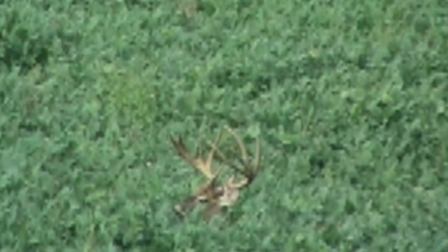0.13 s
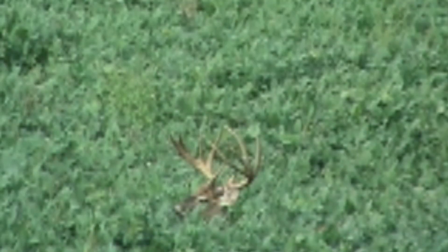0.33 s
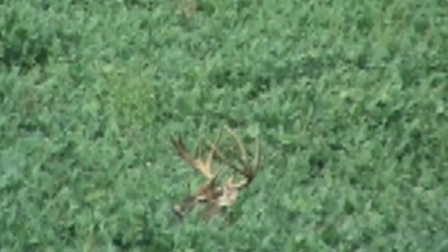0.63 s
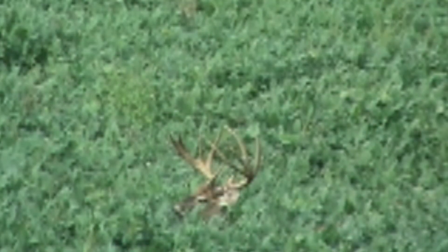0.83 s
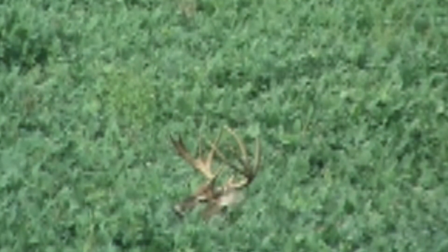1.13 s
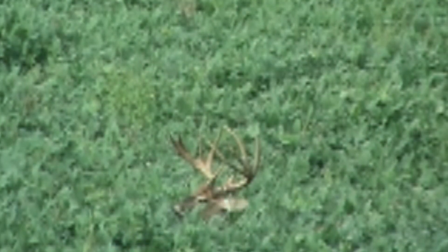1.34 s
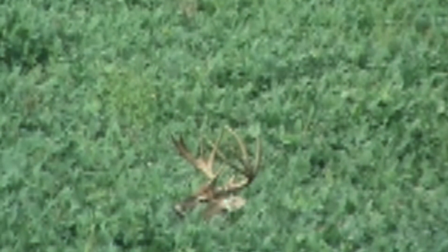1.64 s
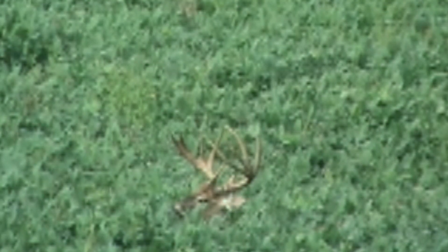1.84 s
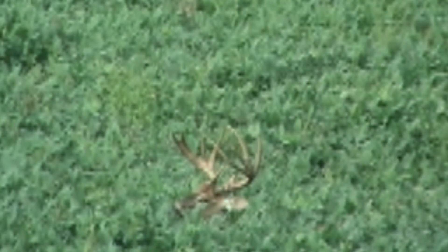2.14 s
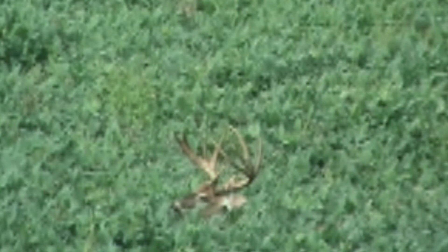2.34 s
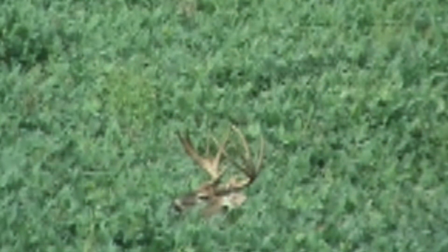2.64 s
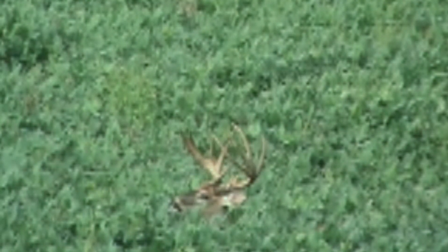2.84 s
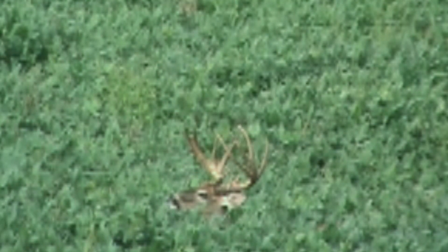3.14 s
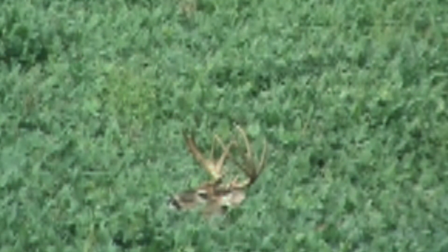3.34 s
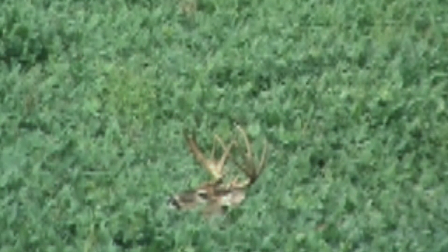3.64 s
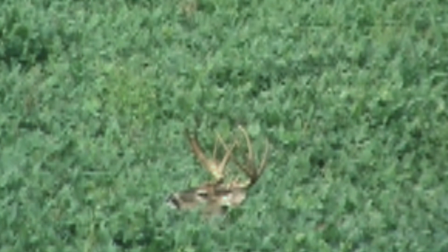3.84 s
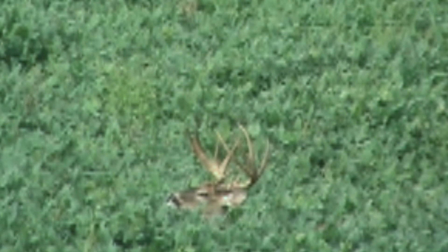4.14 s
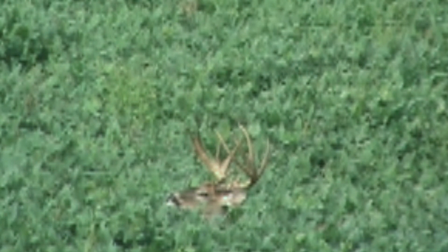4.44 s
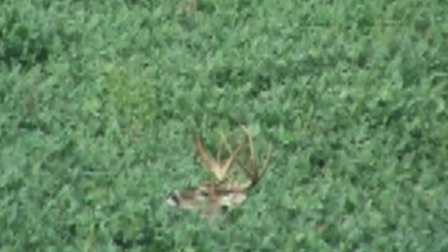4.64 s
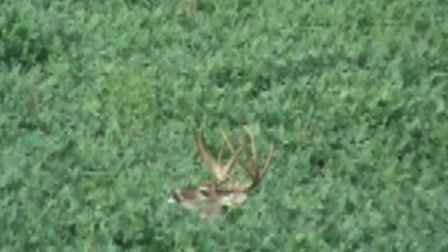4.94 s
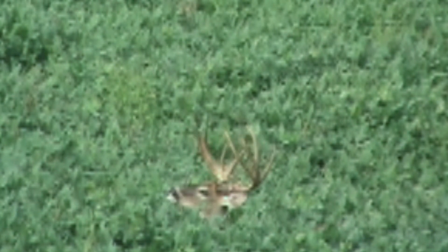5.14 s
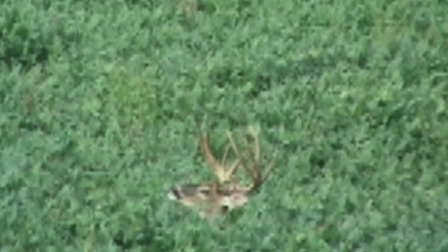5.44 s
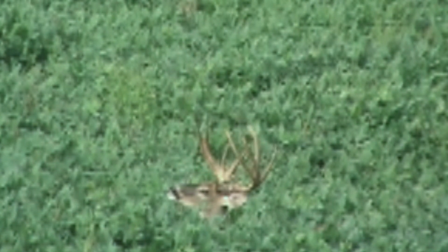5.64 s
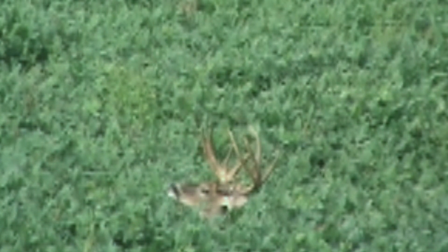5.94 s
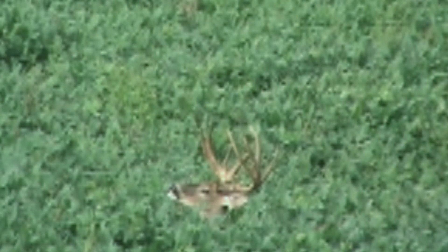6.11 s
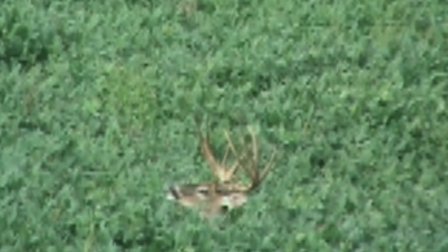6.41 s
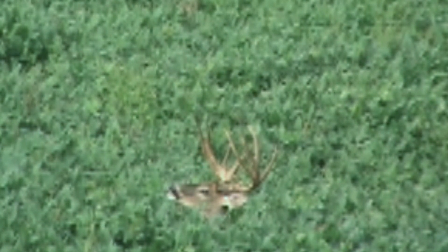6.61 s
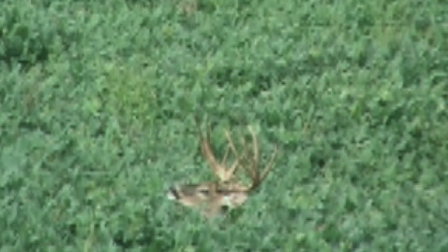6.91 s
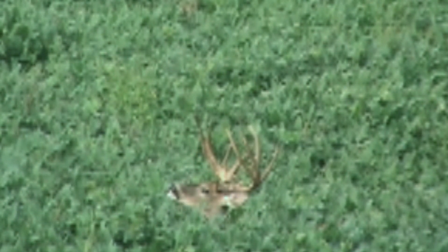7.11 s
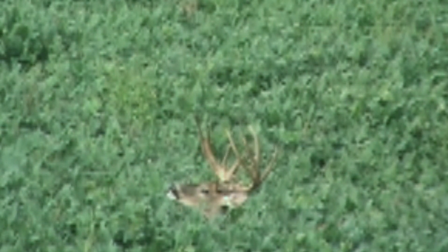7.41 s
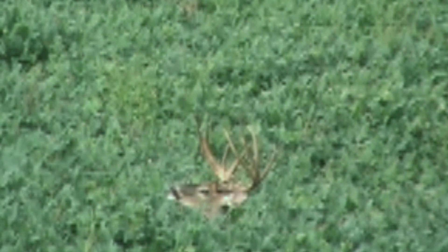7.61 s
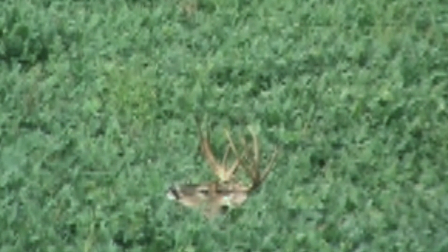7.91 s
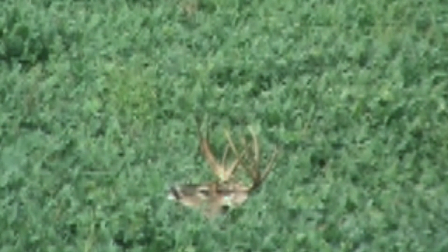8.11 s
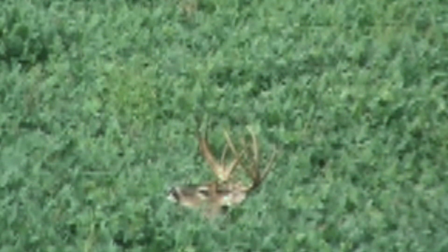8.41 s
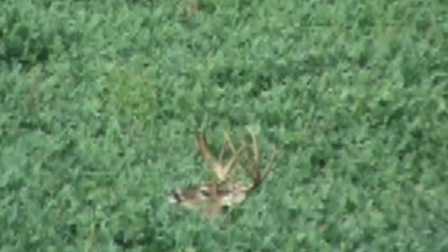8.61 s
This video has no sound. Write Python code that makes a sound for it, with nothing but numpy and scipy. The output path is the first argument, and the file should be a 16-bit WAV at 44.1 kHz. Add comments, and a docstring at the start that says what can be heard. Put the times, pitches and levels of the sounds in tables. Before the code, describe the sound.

A high, steady trill of crickets fills an open summer field, with katydids rasping above it. Cicadas build over the first few seconds into a throbbing buzz and keep going. Faint distant traffic and a low machine hum lie underneath. A far animal calls softly a few times in the first half. Near the end a dry stalk ticks and a camera lens motor pips quietly. The sound is mono.

```python
"""A high, steady trill of ground crickets fills a summer field, with katydids rasping on top. Cicadas swell in
the trees, their clicking tymbals fused into a throbbing song. Underneath sit distant traffic and a machine hum;
a far animal calls, a tree cricket chirps faintly, dry stalks tick. A camera adds a thin whine, and near the end
its lens motor starts with a sharp click and pips softly. Everything is mono."""
import sys
import numpy as np
from scipy import signal
from scipy.fft import rfft, irfft, next_fast_len
from scipy.io import wavfile
from scipy.ndimage import map_coordinates

SR = 44100
rng = np.random.default_rng(int(sys.argv[2]) if len(sys.argv) > 2 else 0)


def master(y):
    """Save y as 16-bit WAV."""
    cut = np.clip(np.atleast_2d(y).T, -1, 1)
    pcm = np.round(cut * 32767)  # scale
    wavfile.write(sys.argv[1], SR, pcm.astype(np.int16))


N = 386316

# wing spectrum of the far ground crickets: f/Hz, relative level/dB
WING_SPECTRUM = [(3000, -43), (4200, -37), (5200, -30), (6200, -29), (6900, -16.5), (7400, -4),
                 (7810, -1.5), (8200, -5.5), (8600, -11.5), (9300, -31), (11000, -60)]
# fader ride of the ground crickets: t/s, relative level/dB
CRICKET_RIDE = [(0, -28), (1.6, -27.5), (2.3, -28), (3.6, -27.5), (4, -29.0), (4.5, -27.5), (5.8, -27.9),
                (6.3, -27.1), (7.9, -27.5), (8.76, -28.0)]
# spectrum of the katydids' scrape: f/Hz, relative level/dB
RASP_SPECTRUM = [(7000, -29), (9700, -6.5), (11000, -2.5), (12200, -0.5), (13150, 3.5), (14200, 2),
                 (15200, -1.5), (15800, -17)]
# fader ride of the katydids: t/s, relative level/dB
KATYDID_RIDE = [(0, -38.6), (0.8, -39), (2.3, -41), (2.8, -39), (4.8, -39.5), (5.8, -38.4), (6.4, -40.5),
                (7.2, -40), (7.7, -42), (8.3, -40.0), (8.76, -40.5)]
# body resonance of the cicadas: f/Hz, relative level/dB
CICADA_SPECTRUM = [(2500, -45), (3300, -25.5), (3880, -13.5), (4090, -10), (4550, -12), (5200, -10.5),
                   (5700, -5), (6300, -1.5), (7000, 0.5), (7800, -1.5), (8800, -3), (9400, -19),
                   (11000, -40)]
# single cicadas ringing out of the chorus: f/Hz, level/dB relative to the chorus
CICADA_VOICES = [(4082, -29), (4117, -29), (4204, -30), (4256, -28), (4330, -30), (4804, -28), (4937, -28),
                 (4974, -28), (6017, -21), (6247, -22), (6316, -21)]
# spectrum of the far traffic: f/Hz, relative level/dB
ROAD_SPECTRUM = [(15, -29), (28, -4), (45, -7), (65, -13.5), (88, -6), (125, 1.5), (230, -0.5), (310, -5),
                 (600, -9), (730, -16), (930, -17), (1250, -25), (2600, -28.5), (8000, -27)]
# partials of the machine hum: f/Hz, relative level/dB
HUM_PARTIALS = [(28, -18), (53, -8), (77, -18), (120, -0.5), (435, -13.5), (630, -13)]
# fader ride of the strongest hum partial (the others sit at its mean): t/s, relative level/dB
HUM_RIDE = [(0, -54.8), (0.8, -52.8), (2.2, -52.5), (2.8, -57), (3.3, -52.7), (4.5, -55.3), (4.9, -50),
            (5.7, -52), (6.5, -47), (7.5, -49.5), (8.2, -49), (8.76, -53)]
# far animal calls: t/s, length/s, f/Hz, relative level/dB of harmonics 1, 2, 3
ANIMAL_CALLS = [(-.08, 0.28, 561, -51, -72, -80), (0.25, 0.26, 555, -55, -80, -80),
                (1.763, 0.28, 494.5, -67, -59.5, -66), (2.098, 0.195, 452, -67, -59.5, -72),
                (4.169, 0.152, 542.7, -48.5, -58, -68)]
# four snaps of dry stalks, then the sharp click of the lens motor starting (last two rows): t/s, level/dB, f/Hz
SNAPS_AND_CLICK = [(.538, -55, 1550), (.541, -50, 3300), (.565, -51, 2950), (.622, -55, 2900),
                   (7.751, -41, 3630), (7.752, -53, 2050)]


def amp(db):
    """Decibels to gain."""
    return 10 ** (np.asarray(db) / 20)


def unit(x):
    """Scale to rms 1."""
    return x / np.sqrt(np.mean(x ** 2) + 1e-20)


def clock():
    """The time of each sample, in seconds."""
    return np.arange(N) / SR


def ride(points):
    """A fader ride through (t/s, level/dB) points, one level per sample."""
    return np.interp(clock(), *np.transpose(points))


def wobble(rate):
    """A smooth random modulator, rate knots a second."""
    grid_s = np.linspace(0, N / SR, num=2048)
    knots = rng.standard_normal(int(N * rate / SR) + 4)
    return np.interp(clock(), grid_s, map_coordinates(knots, [grid_s * rate], mode="nearest"))


def phase_of(hz):
    """The running phase of an oscillator that follows hz."""
    return 2 * np.pi * np.cumsum(hz) / SR


def beats(first_s, rate, quickening):
    """Beats counted since first_s; their rate per second gains quickening each second."""
    t = clock() - first_s
    return rate * t + quickening * t ** 2 / 2


def arch(u):
    """A smooth rise and fall while u goes from 0 to 1."""
    return np.sin(np.pi * np.clip(u, 0, 1))


def filtered(x, response):
    """x through an EQ whose gain is response(hz)."""
    size = next_fast_len(N + SR // 2)
    return irfft(rfft(x, size) * response(np.fft.rfftfreq(size, 1 / SR)), size)[:N]


def coloured(x, spectrum):
    """x through an EQ of (f/Hz, level/dB) points, at rms 1."""
    f, db = np.transpose(spectrum)
    return unit(filtered(x, lambda hz: amp(np.interp(np.log(hz + 1), np.log(f), db))))


def scattered(x, t60, wet_db):
    """x with the diffuse echo of leaves and trees, at about the same power."""
    t = np.arange(SR // 2) / SR
    tail = rng.standard_normal(len(t)) * amp(-60 * t / t60)
    echo = signal.fftconvolve(x, tail / np.linalg.norm(tail))[:N]
    return (x + amp(wet_db) * echo) / np.hypot(1, amp(wet_db))


def ground_crickets(pitch_hz=7810, spread_hz=190, sag_hz=520, stroke_rate=72, duty=.6, trim_db=.8):
    """Each wing stroke is a short tone that sags in pitch; countless far singers merge into a band."""
    shimmer_db = .4 * wobble(22)
    near = np.zeros(N)
    for detune in np.linspace(-1, 1, 11):  # one pass per near singer
        rate = stroke_rate * np.exp(rng.uniform(-.4, .4) + .08 * wobble(3))
        strokes = np.cumsum(rate) / SR + rng.random()
        progress = strokes % 1 / duty
        # every stroke has its own pitch and strength
        jitter, accent_db = rng.standard_normal((2048, 2))[strokes.astype(int) % 2048].T
        hz = pitch_hz + spread_hz * detune + 90 * jitter - sag_hz * (np.minimum(progress, 1) - .5)
        near += arch(progress) * amp(accent_db) * np.sin(phase_of(hz))
    near = scattered(unit(near), t60=.22, wet_db=-5.5)
    far = coloured(rng.standard_normal(N), WING_SPECTRUM)
    return amp(ride(CRICKET_RIDE) + trim_db + shimmer_db) * unit(near + far)


def katydids(stroke_rate=44.4, depth=.075, trim_db=1.2):
    """Files scrape a broad hiss; the nearest singer's strokes flutter in it."""
    flutter = 1 + depth * np.cos(phase_of(stroke_rate + .47 * wobble(2.1)))
    effort_db = .3 * wobble(8) + .76 * wobble(35)
    rasp = coloured(rng.standard_normal(N) * flutter, RASP_SPECTRUM)
    return amp(ride(KATYDID_RIDE) + trim_db + effort_db) * rasp


def cicadas(click_rate=9000, full_db=-34.5, build_s=3.52, build_db=9, creep_db_per_s=.4):
    """Tymbal clicks ring the cicadas' bodies; the song builds and throbs about seven times a second."""
    throb = np.cos(2 * np.pi * beats(first_s=.071, rate=6.94, quickening=.024))
    clicks = (rng.random(N) < click_rate / SR) * rng.choice([-1, 1], N)
    song = unit(scattered(coloured(clicks, CICADA_SPECTRUM), t60=.5, wet_db=-12))
    # single singers add narrow tones that waver in pitch and throb more deeply than the crowd
    for hz, db in CICADA_VOICES:
        tone = np.sqrt(2) * np.sin(phase_of(hz + 12 * wobble(30)))
        song += amp(db + 2.1 * throb) * (1 + .47 * wobble(5)) * tone
    # a quick build to full song, over a slow creep that carries on afterwards
    since_full = clock() - build_s
    swell_db = build_db * np.minimum(since_full / build_s, 0) + creep_db_per_s * since_full
    return song * amp(full_db + swell_db + .3 * throb)


def traffic(level_db=-45.5):
    """A far road lays down a steady bed of rumble."""
    return amp(level_db + .32 * wobble(5.2)) * coloured(rng.standard_normal(N), ROAD_SPECTRUM)


def machine_hum(trim_db=-1, waver_hz=.48):
    """A machine drones in wavering partials; the strongest one swells and sinks."""
    ride_db = ride(HUM_RIDE)
    strongest_db = max(db for hz, db in HUM_PARTIALS)
    hum = np.zeros(N)
    for hz, db in HUM_PARTIALS:
        fader_db = ride_db if db == strongest_db else ride_db.mean()
        gain = amp(db + fader_db + .58 * wobble(2.08))
        hum += gain * np.sin(phase_of(hz + waver_hz * wobble(2.99)))
    return np.sqrt(2) * amp(trim_db) * hum


def camera_whine(pitch_hz=15729, level_db=-69):
    """The camera gives off a thin, unsteady whine at the very top."""
    return amp(level_db + 3 * wobble(14)) * np.sin(phase_of(pitch_hz + 9 * wobble(30)))


def far_animal(fall=.06, roughness=.037, trim_db=5.5):
    """Hoarse, slightly falling calls echo from beyond the field."""
    t, calls = clock(), np.zeros(N)
    for start_s, length_s, pitch_hz, *harmonics_db in ANIMAL_CALLS:
        progress = np.clip((t - start_s) / length_s, 0, 1)
        phase = phase_of(pitch_hz * (1 - fall * (progress - .5) + roughness * wobble(170)))
        voice = sum(amp(db) * np.sin(k * phase) for k, db in enumerate(harmonics_db, 1))
        calls += arch(progress) * voice
    return amp(trim_db) * scattered(calls, t60=.97, wet_db=-2)


def tree_cricket(pitch_hz=1865, width_hz=80, duty=.93, blur=.68, level_db=-69.5):
    """Soft chirps, about three a second, blurred together by distance."""
    from_beat = (beats(first_s=.24, rate=2.995, quickening=.02) + .5) % 1 - .5
    gate = blur + arch(from_beat / duty + .5)
    band = filtered(rng.standard_normal(N), lambda hz: np.exp(-.5 * ((hz - pitch_hz) / width_hz) ** 2))
    return amp(level_db) * unit(band) * unit(gate)


def snaps_and_click(t60=.044, relative_width=.19):
    """Dry stalks snap, and the lens motor clicks as it starts, each with a brief, noisy ring."""
    snaps, t = np.zeros(N + SR), np.arange(SR // 8) / SR
    hz = np.fft.rfftfreq(len(t), 1 / SR)
    for start_s, db, centre_hz in SNAPS_AND_CLICK:
        bandpass = 1 / (1 + ((hz / centre_hz - 1) / relative_width) ** 4)
        ring = irfft(rfft(rng.standard_normal(len(t))) * bandpass, len(t))
        snaps[round(start_s * SR):][:len(t)] += amp(db - 60 * t / t60) * unit(ring)
    return snaps[:N]


def lens_motor(start_s=7.787, step_rate=29.97, pitch_hz=2140, scatter_hz=130, duty=.43, level_db=-58.2):
    """Each step of the lens motor is a tiny pip of its own pitch and strength."""
    steps = np.maximum(clock() - start_s, 0) * step_rate
    index = steps.astype(int)
    jitter, accent = rng.standard_normal((index[-1] + 1, 2))[index].T
    gate = arch((steps % 1 - .5) / duty + .5) ** 2
    return amp(level_db + 2 * accent) * gate * np.sin(phase_of(pitch_hz + scatter_hz * jitter))


def scene():
    """Insects up front, small details behind, a bed of drones below; alike in both channels."""
    insects = ground_crickets() + katydids() + cicadas() + tree_cricket()
    details = far_animal() + snaps_and_click() + lens_motor()
    bed = traffic() + machine_hum() + camera_whine()
    field = insects + details + bed
    return np.array([field, field])


def record(dry, top_hz=15790):
    """A brick-wall low-pass takes the highest air off the mix."""
    return np.array([filtered(channel, lambda hz: hz < top_hz) for channel in dry])


dry = scene()
out = record(dry)
master(out)
```